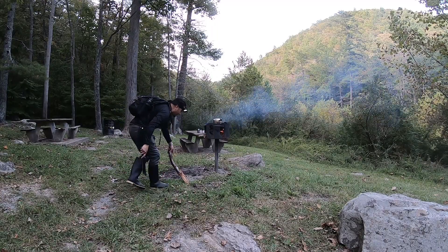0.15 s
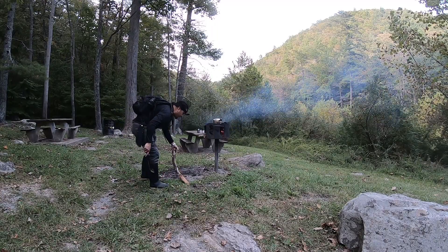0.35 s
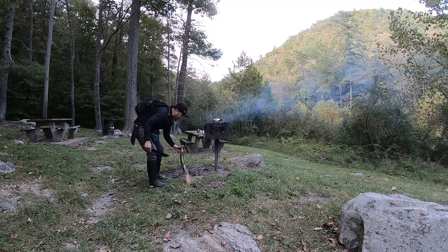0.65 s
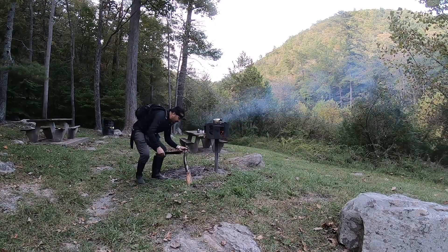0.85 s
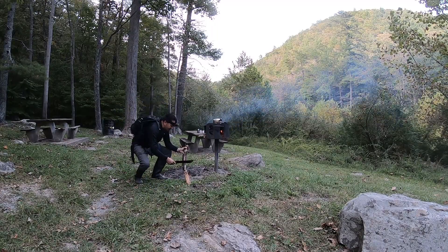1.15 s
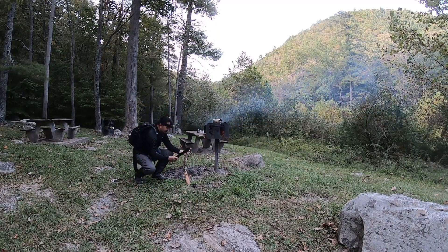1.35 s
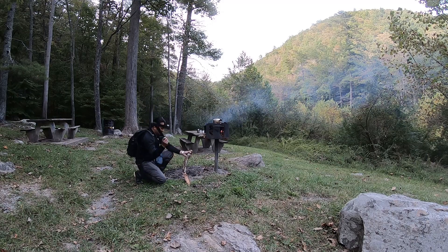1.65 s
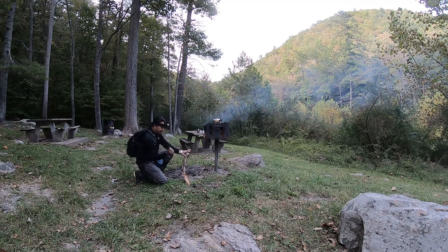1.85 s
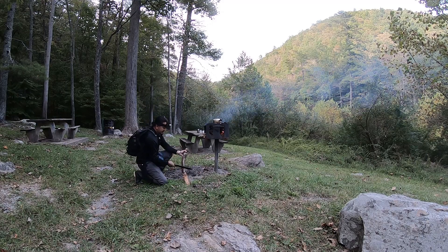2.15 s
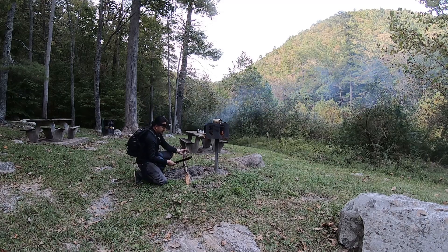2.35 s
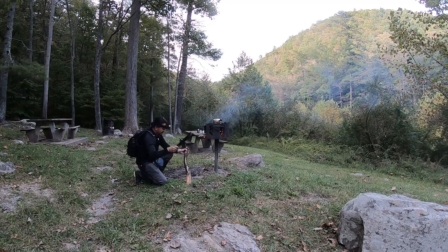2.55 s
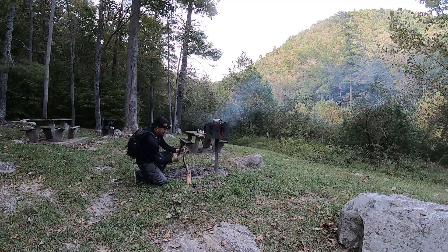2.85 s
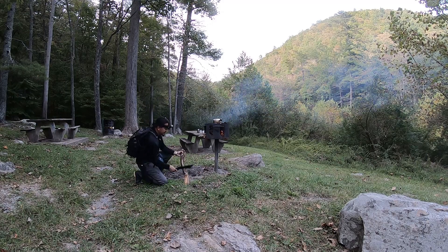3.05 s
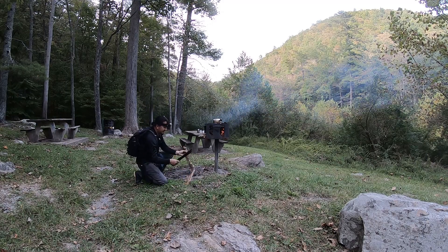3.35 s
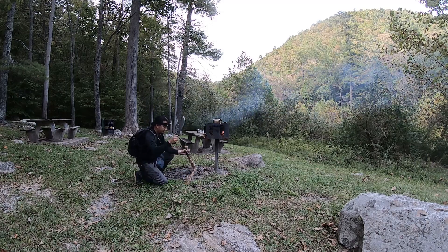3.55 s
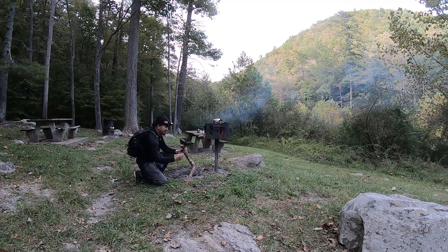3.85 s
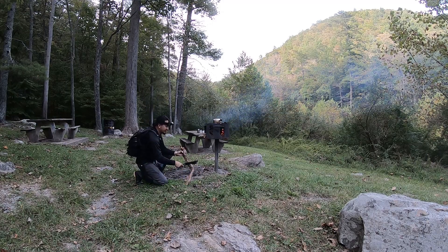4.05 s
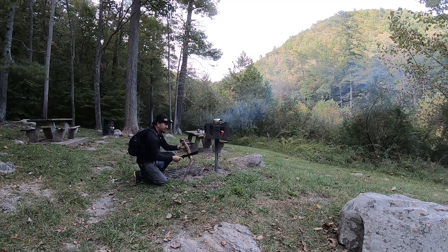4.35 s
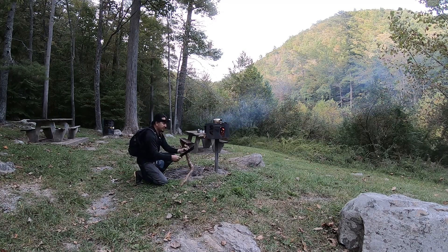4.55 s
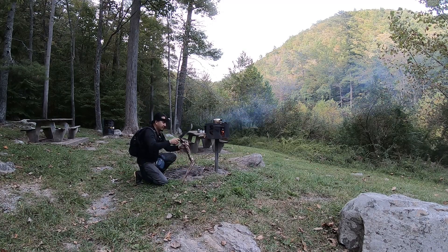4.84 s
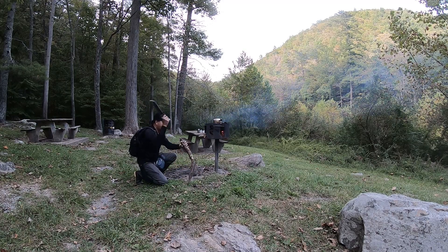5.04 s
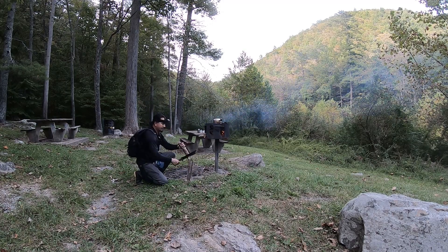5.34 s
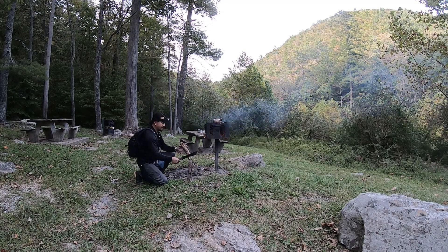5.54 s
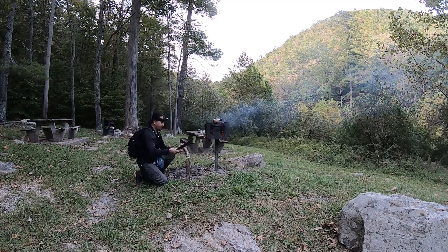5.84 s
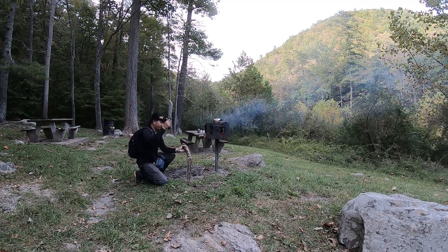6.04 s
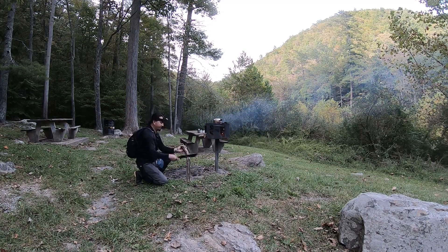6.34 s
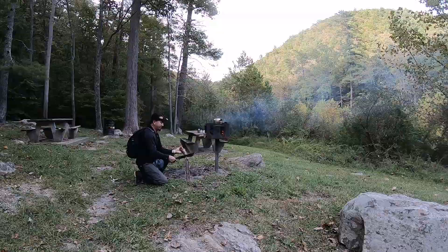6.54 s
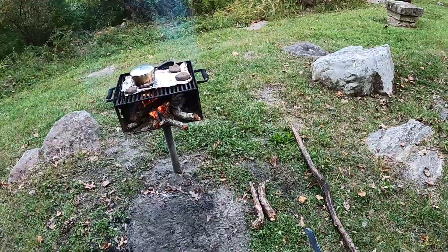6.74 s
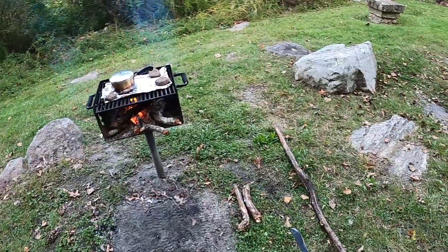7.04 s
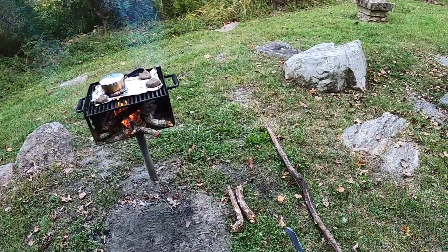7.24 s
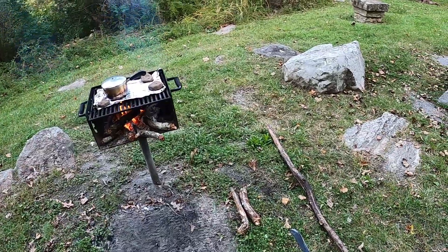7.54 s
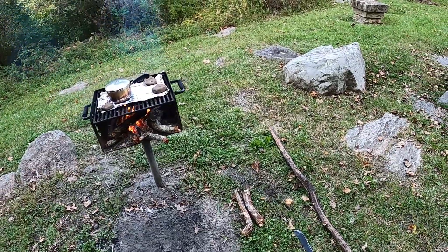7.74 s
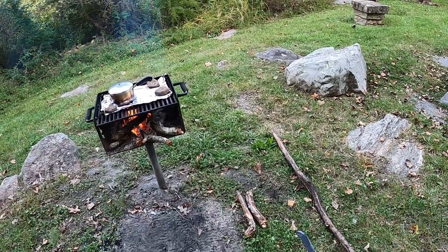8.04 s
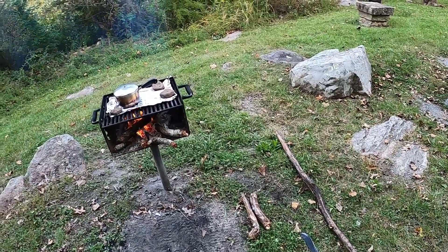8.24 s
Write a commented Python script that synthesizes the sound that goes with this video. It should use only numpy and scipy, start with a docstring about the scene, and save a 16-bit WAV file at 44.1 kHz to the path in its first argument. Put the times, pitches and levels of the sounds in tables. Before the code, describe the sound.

In a quiet forest, a long blade chops a dry branch six times, about once a second. Each blow cracks sharply, with a faint metal ring, a soft thud into the turf and a short echo off the trees. Leaves and a far stream hiss faintly, with crickets and twig ticks. After a brief silence, a pot simmers close to the microphone in a steady rush, with crickets chirping nearby.

```python
"""A long blade chops a dry branch in a forest: each blow cracks, rings branch and blade, thuds into
the turf and echoes off the trunks. Leaves and a far stream hiss over a low drone; crickets sing,
twigs tick. After a short silence, a second scene: a close pot simmers on a wood fire, its tiny
bubbles merging into a rush, with a few ticks and crickets nearby."""
import sys
import numpy as np
from scipy import signal
from scipy.fft import rfft, irfft
from scipy.io import wavfile

SR = 44100
rng = np.random.default_rng(int(sys.argv[2]) if len(sys.argv) > 2 else 0)


def transcribe(signal):
    """Save signal, clipped to [-1, 1], as a 16-bit WAV file at the path in sys.argv[1]."""
    frames = np.atleast_2d(signal).T
    limited = np.clip(frames, -1, 1)
    pcm = np.round(limited * 32767).astype(np.int16)
    wavfile.write(sys.argv[1], SR, pcm)


N = 369910

# leaves and stream (frequency [Hz], relative density [dB])
LEAF_SPECTRUM = [(18, -34.5), (40, -11.5), (60, -2), (105, -14), (200, 1.5), (500, -6.5), (800, -6),
                 (1600, -8), (2900, -19.5), (4900, -23.5), (6500, -23.5), (7400, -40), (9500, -44),
                 (11000, -52.5), (16000, -64)]
# far drone (time [s], level [dB])
DRONE_LEVELS = [(0.0, -72), (.8, -62), (1.75, -63.5), (2.1, -58.5), (2.85, -60.5), (3.5, -73), (4.3, -68),
                (4.86, -61.5), (5.72, -72), (6.4, -65.5)]
# cricket chorus in the forest (centre [Hz], width [Hz], level [dB], swell [dB])
FOREST_VOICES = [(3556, 520, -73.5, 1.8), (4154, 840, -73, 1.5), (5510, 390, -76.5, 1.5),
                 (12430, 1500, -96.5, 0.5)]
# cricket chorus by the fire (centre [Hz], width [Hz], level [dB], swell [dB])
FIRESIDE_VOICES = [(3500, 350, -68, 1.5), (4350, 550, -65, 1.2), (5750, 400, -72, 1.0)]
# twig and leaf snaps (time [s], peak [dB], centre [Hz], width [oct])
TWIG_SNAPS = [(.221, -63, 7000, 1.3), (.538, -65, 6500, 1.3), (.645, -49.5, 2100, 1.2),
              (.93, -62, 6500, .9), (1.017, -56, 6100, .5), (2.157, -52.5, 6140, .6),
              (2.213, -60, 6510, 1.8), (2.334, -55, 5440, .9), (2.604, -43, 4200, 1.45),
              (3.156, -55, 6200, .7), (4.33, -57, 5800, .6), (4.518, -54, 5950, .9),
              (4.896, -40.5, 3400, 1.8), (5.045, -47.5, 3170, 1.7), (7.029, -50.5, 8160, .9),
              (7.919, -59, 11000, 1.1), (8.304, -48.5, 6000, 1.8), (8.371, -44, 6000, 1.8)]
# held cricket notes (time [s], length [s], pitch [Hz], level [dB])
CRICKET_TRILLS = [(.35, .22, 4500, -72), (1.052, .2, 4500, -68), (1.154, .26, 3950, -71),
                  (1.531, .3, 4100, -63), (1.7, 0.17, 4500, -69), (2.42, 0.23, 4500, -71),
                  (3.15, .13, 4500, -69.5), (3.75, .18, 4460, -70), (4.066, .34, 4110, -65.5),
                  (6.06, .18, 4470, -71), (6.45, .22, 4050, -70), (7.141, .04, 3580, -57),
                  (7.248, 0.038, 3560, -53), (7.31, .085, 2590, -51.5), (8.06, .032, 3800, -57),
                  (8.12, .035, 3880, -56)]
# three-stroke chirps (first stroke [s], pitch [Hz], level [dB])
CRICKET_CHIRPS = [(.44, 4200, -69), (1.04, 4240, -65), (2.15, 4200, -71), (2.71, 4220, -65),
                  (3.37, 4220, -67), (4.46, 4200, -69), (5.01, 4220, -67), (5.52, 4240, -67),
                  (6.11, 4220, -65), (7.198, 4470, -48.5), (7.803, 4480, -53), (8.352, 4450, -50.5)]
# blows (time [s], crack [dB], tilt [dB/oct], sizzle [dB], crack decay [s], late burst gain [dB], # echo [dB],
# low wood [dB], upper wood [dB], favoured wood [Hz], blade [dB], favoured blade [Hz])
BLOWS = [(1.9607, -16, -1, -36, .0016, -33, -21, -30, -14.5, 3300, -62, 8400),
         (2.9304, -17, 1.5, -40, .0026, -19, -17.5, -30, -23.5, 1500, -75, 8320),
         (3.9234, -15, .2, -35, .0014, -30, -18.5, -29.5, -23, 2250, -58, 9250),
         (4.6422, -22.5, 1.5, -52, 0.0022, -35, -47, -39, -35, 2400, -65, 7450),
         (5.3496, -19.5, .2, -36, 0.0023, -24.5, -18.5, -31, -24, 2300, -74, 6450),
         (6.3862, -16, -1, -46, .0029, -27.5, -15, -31.5, -15.5, 2000, -66, 8000)]
# snapping fibres (frequency [Hz], band gain [dB])
CRACK_SPECTRUM = [(300, -17), (900, -12), (2000, -1.5), (3500, 0), (5500, -4), (7500, -17), (9500, -38)]
# trunk echo decay (frequency [Hz], t60 [s])
ECHO_DECAY = [(100, 0.59), (400, 0.34), (1100, 0.12), (2900, 0.66), (7700, 0.23), (14000, .3)]
# trunk echo colour (frequency [Hz], band gain [dB])
ECHO_SPECTRUM = [(140, -23.5), (300, -15), (700, -22.5), (1600, -16), (2300, -21), (4000, -24), (6500, -14),
                 (8400, -25), (10000, -38), (13000, -33), (16000, -32.5)]
# branch modes (frequency [Hz], gain [dB], t60 [s])
BRANCH_MODES = [(165, -4, .04), (248, -2, .045), (370, 3.5, .05), (1560, -1, 0.026), (2250, 0.2, .028),
                (3410, -1.5, 0.024), (5750, -3, .018)]
# blade modes (frequency [Hz], gain [dB], t60 [s])
BLADE_MODES = [(6450, 24, .4), (7450, -6, 1.8), (7750, -1, .9), (8120, -6, 1.5), (8320, -4, 2.2),
               (8900, 3, .7), (13700, -19, .06)]
# branch end on turf (time [s], level [dB], lowest mode [Hz], t60 [s])
TURF_JOLTS = [(1.965, -34, 62, 0.14), (2.97, -36, 62.3, 0.29), (3.96, -34, 66, .18),
              (4.70, -43.5, 62.4, 0.39), (5.36, -31, 69.2, 0.25), (6.395, -27, 70, .27)]
# cut-off piece (frequency [Hz], level [dB], t60 [s])
PIECE_MODES = [(387, -36, .17), (486, -25.5, .071), (3480, -23.5, .024), (3900, -14.5, .012),
               (7420, -18, .02), (7950, -33, .03)]
# simmering pot (time [s], level [dB])
SIMMER_LEVELS = [(6.97, -42.5), (7.082, -40.5), (7.79, -45), (8.244, -45.5), (8.388, -42)]
# bubble rush (frequency [Hz], relative density [dB])
SIMMER_SPECTRUM = [(18, -36), (30, 4), (66, -1), (200, -1), (450, 2.5), (1070, 1), (2300, -13), (3500, -18),
                   (4400, -19), (5700, -25.5), (6600, -30.5), (8800, -30), (10500, -37.5), (12800, -45.5),
                   (14000, -55)]
# stereo width (frequency [Hz], side re mid [dB])
SIDE_GAINS = [(100, -59.5), (2000, -70), (5000, -37), (8000, -22.5), (12000, -5), (16000, -1.5)]

FOREST_END_S, FIRE_START_S, FIRE_FADE_S = 6.712, 6.9, .071
LEAF_DB, DRONE_BAND_HZ = -56.5, (141, 190.6)
FAINT_TICKS_PER_S, FAINT_TICK_DB, FAINT_TICK_HZ, TICK_EDGE_DB = 1.0, -73, 7000, -30
TRILL_HZ, TRILL_DEPTH = 36, .35
STROKE_S, STROKE_SPACING_S, HOOK_HZ = .036, .061, -480
PICKUP_LEAD_S, PICKUP_S, PICKUP_DROP_HZ, PICKUP_DB = .047, .02, 380, -3
LATE_BURST_S, STRIKE_SCATTER_DB = .015, 1.5
WOOD_FALL_DB_PER_OCT, BLADE_FALL_DB_PER_OCT = 14, 110
THUD_RISE_PER_T60, PIECE_S, PIECE_LOW_LAG_S = .077, 4.6445, .0095
BUBBLES_PER_S = 6000
HOUSING_NOTCH_HZ, LOW_CUT_HZ, HIGH_CUT_HZ = (10000, 11900), 45, 16500


def amp(db):
    """Decibels to gain."""
    return 10 ** (np.asarray(db) / 20)


def rms_one(x):
    """Scale to rms 1."""
    return x / np.sqrt(np.mean(x ** 2) + 1e-20)


def at_hz(points, hz):
    """Read a (frequency [Hz], value) table on a log axis."""
    return np.interp(np.log(hz), np.log(np.array(points)[:, 0]), np.array(points)[:, 1])


def band(x, low_hz, high_hz):
    """Butterworth band-pass."""
    sos = signal.butter(2, [low_hz, min(high_hz, .45 * SR)], "band", fs=SR, output="sos")
    return signal.sosfilt(sos, x)


def drift(rate_hz):
    """Slow random wander, rms 1."""
    r = np.exp(-80 * np.pi * rate_hz / SR)
    slow = signal.lfilter([1], [1, -2 * r, r * r], rng.standard_normal(N // 40 + 2002))[2000:]
    return np.interp(np.arange(N) / 40, np.arange(len(slow)), rms_one(slow))


def coloured(x, spectrum):
    """Give steady noise a spectrum; rms 1."""
    hz = np.maximum(np.fft.rfftfreq(len(x), 1 / SR), 1)
    return rms_one(irfft(rfft(x) * amp(at_hz(spectrum, hz)), len(x)))


def ring(x, hz, t60_s):
    """Resonator: a unit click rings a decaying sine of height 1."""
    r, w = amp(-60 / (t60_s * SR)), 2 * np.pi * hz / SR
    return signal.lfilter([0, np.sin(w)], [1, -2 * r * np.cos(w), r * r], x)


def add(out, s, sound):
    """Mix a sound in at a time."""
    i = round(s * SR)
    out[i:i + len(sound)] += sound[:N - i]


def leaves_and_stream():
    """Leaves and far water: a gently wavering hiss."""
    return amp(LEAF_DB + .5 * drift(6)) * coloured(rng.standard_normal(N), LEAF_SPECTRUM)


def drone(t):
    """A far, low band of noise swells and sinks."""
    level_db = np.interp(t, *np.transpose(DRONE_LEVELS))
    return amp(level_db) * rms_one(band(rng.standard_normal(N), *DRONE_BAND_HZ))


def chorus(voices):
    """Many distant crickets blur into swelling bands of noise."""
    out = np.zeros(N)
    for hz, width_hz, level_db, swell_db in voices:
        edges_hz = hz - width_hz / 2, hz + width_hz / 2
        gain = amp(level_db + swell_db * drift(2.5))
        out += gain * rms_one(band(band(rng.standard_normal(N), *edges_hz), *edges_hz))
    return out


def twig_ticks():
    """Dry snaps: a narrow body over a broad click; faint ones fall at random."""
    out, t = np.zeros(N), np.arange(int(.03 * SR)) / SR
    faint_s = np.cumsum(rng.exponential(1, 20)) / FAINT_TICKS_PER_S
    faint = [(s, FAINT_TICK_DB, FAINT_TICK_HZ, 1.5) for s in faint_s if s < FOREST_END_S - .03]
    for s, peak_db, hz, octaves in TWIG_SNAPS + faint:
        edges_hz = hz / 2 ** (octaves / 2), hz * 2 ** (octaves / 2)
        burst = rng.standard_normal(len(t)) * np.exp(-t / .006)
        snap = band(band(burst, *edges_hz), *edges_hz) + amp(TICK_EDGE_DB) * band(burst, 1500, 15000)
        add(out, s, amp(peak_db) * snap / np.max(np.abs(snap)))
    return out


def crickets():
    """Wavering sines: held notes throb, wing strokes hook downward; leaves in the way roughen both."""
    out, waver, flutter = np.zeros(N), drift(40), drift(120)
    notes = [(s, length_s, hz, 0, db, TRILL_DEPTH) for s, length_s, hz, db in CRICKET_TRILLS]
    for s, hz, db in CRICKET_CHIRPS:
        notes.append((s - PICKUP_LEAD_S, PICKUP_S, hz - PICKUP_DROP_HZ, HOOK_HZ / 4, db + PICKUP_DB, 0))
        notes += [(s + k * STROKE_SPACING_S, STROKE_S, hz, HOOK_HZ, db, 0) for k in range(3)]
    for s, length_s, start_hz, hook_hz, db, depth in notes:
        wobble_hz = 42 * waver[round(s * SR):][:int(length_s * SR)]
        t = np.arange(len(wobble_hz)) / SR
        hz = start_hz + hook_hz * (t / length_s) ** 3.5 + wobble_hz
        pulses = 1 - depth * (1 + np.cos(2 * np.pi * TRILL_HZ * t)) / 2
        fades = np.minimum(np.minimum(t, length_s - t) / .0066, 1)
        add(out, min(s, N / SR), amp(db) * fades * pulses * np.sin(2 * np.pi * np.cumsum(hz) / SR))
    return out * amp(3.5 * flutter)


def chops():
    """Fibres snap in a burst that rings branch and blade; the trunks return a dying wash."""
    out, t = np.zeros(N), np.arange(int(1.2 * SR)) / SR
    edges_hz = 140 * 2 ** np.arange(0, 7.1, .5)
    for (s, crack_db, tilt_db_per_oct, sizzle_db, decay_s, late_db,
         echo_db, low_db, wood_db, wood_hz, blade_db, blade_hz) in BLOWS:
        white = rng.standard_normal((4, len(t)))
        fibres = white[0] * np.sqrt(t / decay_s) * np.exp(-t / decay_s)
        # late burst: a fainter, band-limited burst follows shortly after
        late_age = np.maximum(t - LATE_BURST_S, 0) / .003
        late_burst = amp(late_db) * band(white[0] * late_age * np.exp(1 - late_age), 1200, 6500)
        sound = np.zeros(len(t))
        for k, (low_hz, high_hz) in enumerate(zip(edges_hz, edges_hz[1:])):
            hz = np.sqrt(low_hz * high_hz)
            crack = band(band(fibres + late_burst, low_hz, high_hz), low_hz / 1.2, high_hz * 1.2)
            tilt_db = tilt_db_per_oct * np.log2(hz / 3000)
            band_db = crack_db + tilt_db + at_hz(CRACK_SPECTRUM, hz) if hz < 10000 else sizzle_db
            sound += amp(band_db) * crack / np.max(np.abs(crack))
            wash = white[1 + k % 2] * (1 - np.exp(-t / .0069)) * amp(-60 * t / at_hz(ECHO_DECAY, hz))
            sound += amp(echo_db + at_hz(ECHO_SPECTRUM, hz)) * band(wash, low_hz, high_hz)
        tree_echo = amp(-35.5) * white[3] * (1 - np.exp(-t / .027)) * amp(-60 * t / .5)
        flutter = .7 + .5 * rms_one(band(white[2], 10, 70))  # blade turns in the hand
        for hz, mode_db, t60_s in BRANCH_MODES + BLADE_MODES:
            # the strike point favours modes near one pitch
            if hz < 1000:
                struck_db = low_db
            elif hz < 6000:
                struck_db = wood_db - WOOD_FALL_DB_PER_OCT * abs(np.log2(hz / wood_hz))
            elif hz <= 10000:
                struck_db = blade_db - BLADE_FALL_DB_PER_OCT * abs(np.log2(hz / blade_hz))
            else:
                struck_db = sizzle_db
            tone = ring(fibres + tree_echo * (1000 < hz < 6000), hz, t60_s)
            gain = amp(struck_db + mode_db + STRIKE_SCATTER_DB * rng.standard_normal())
            blur = np.roll(flutter, int(hz)) if hz > 6000 else 1
            sound += gain * blur * tone / np.max(np.abs(tone))
        add(out, s, sound)
    return out


def turf_thuds():
    """The branch end jolts soft turf, which answers late with three low beating modes."""
    out, t = np.zeros(N), np.arange(int(.5 * SR)) / SR
    for s, level_db, hz, t60_s in TURF_JOLTS:
        phase = 2 * np.pi * hz * t
        modes = np.sin(phase) + .74 * np.sin(1.25 * phase) + .22 * np.sin(2.7 * phase)
        rise = 1 - np.exp(-t / (THUD_RISE_PER_T60 * t60_s))
        add(out, s, amp(level_db - 60 * t / t60_s) * rise * modes)
    return out


def loose_piece():
    """The cut-off piece rings as it springs free; its low modes speak late."""
    out, t = np.zeros(N), np.arange(int(.5 * SR)) / SR
    for hz, level_db, t60_s in PIECE_MODES:
        envelope = amp(level_db - 60 * t / t60_s) * (1 - np.exp(-t * hz))
        add(out, PIECE_S + PIECE_LOW_LAG_S * (hz < 1000), envelope * np.sin(2 * np.pi * hz * t))
    return out


def simmer(t):
    """Thousands of tiny bubbles collapse on the pot's hot base and merge into a rush."""
    sizes = amp(2 * np.minimum(rng.exponential(1, N), 5)) * rng.choice([-1, 1], N)
    bubbles = sizes * (rng.random(N) < BUBBLES_PER_S / SR)
    level_db = np.interp(t, *np.transpose(SIMMER_LEVELS)) + .32 * drift(11)
    return amp(level_db) * coloured(bubbles, SIMMER_SPECTRUM)


def scene():
    """The forest stops short, the fireside fades in; near mono except in the treble."""
    t = np.arange(N) / SR
    forest_gate = np.clip((FOREST_END_S - t) / .00094, 0, 1)
    fire_gate = np.clip((t - FIRE_START_S) / FIRE_FADE_S, 0, 1) ** 2.35
    housing_notch = signal.butter(3, HOUSING_NOTCH_HZ, "bandstop", fs=SR, output="sos")
    hits = signal.sosfilt(housing_notch, forest_gate * chops() + twig_ticks())
    forest = leaves_and_stream() + drone(t) + chorus(FOREST_VOICES) + turf_thuds() + loose_piece()
    fireside = simmer(t) + chorus(FIRESIDE_VOICES)
    mid = forest_gate * forest + fire_gate * fireside + crickets() + hits
    hz = np.maximum(np.fft.rfftfreq(N, 1 / SR), 1)
    # quarter-cycle shift: channels differ in phase, not level
    side = irfft(rfft(mid) * amp(at_hz(SIDE_GAINS, hz)) * 1j, N)
    return np.array([mid + side, mid - side])


def record(dry):
    """A small microphone loses the deepest bass; the top is cut."""
    thin = signal.sosfilt(signal.butter(3, LOW_CUT_HZ, "high", fs=SR, output="sos"), dry)
    return signal.sosfilt(signal.cheby2(12, 70, HIGH_CUT_HZ, fs=SR, output="sos"), thin)


dry = scene()
out = record(dry)
transcribe(out)
```